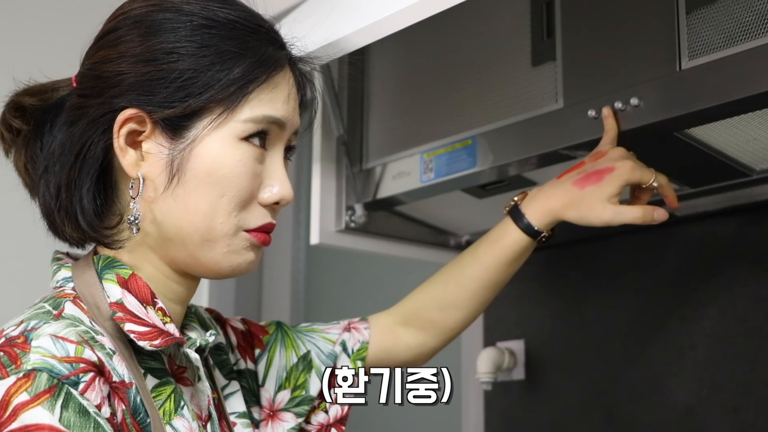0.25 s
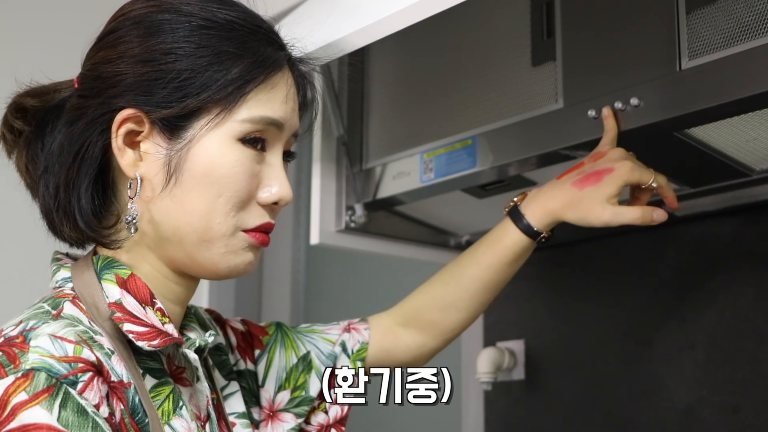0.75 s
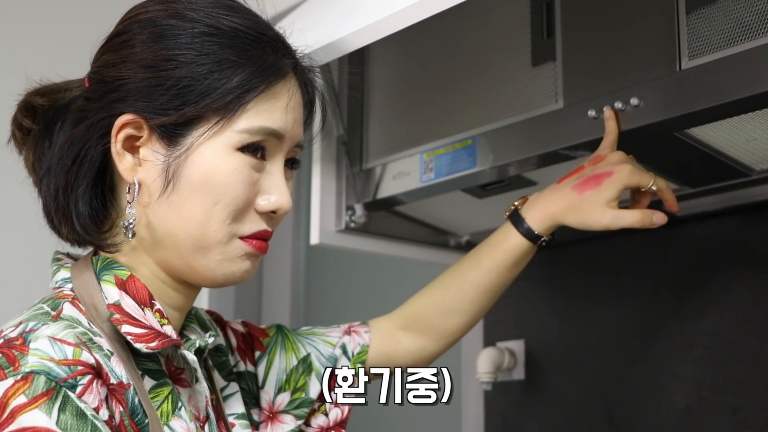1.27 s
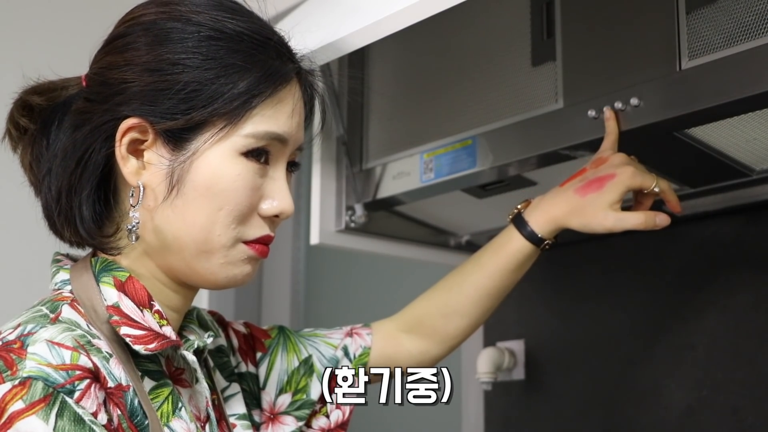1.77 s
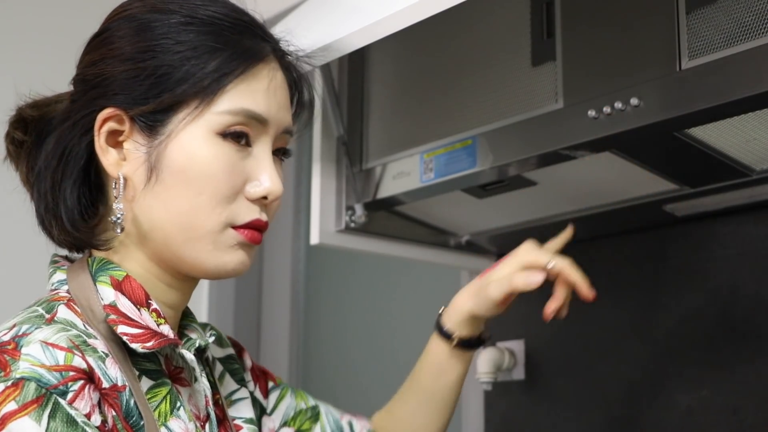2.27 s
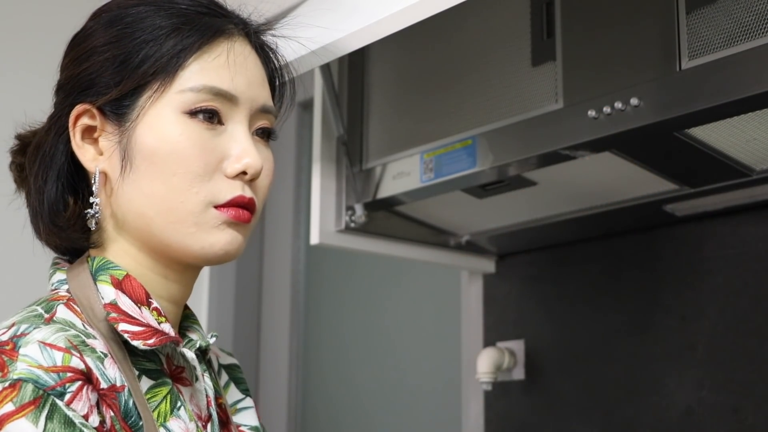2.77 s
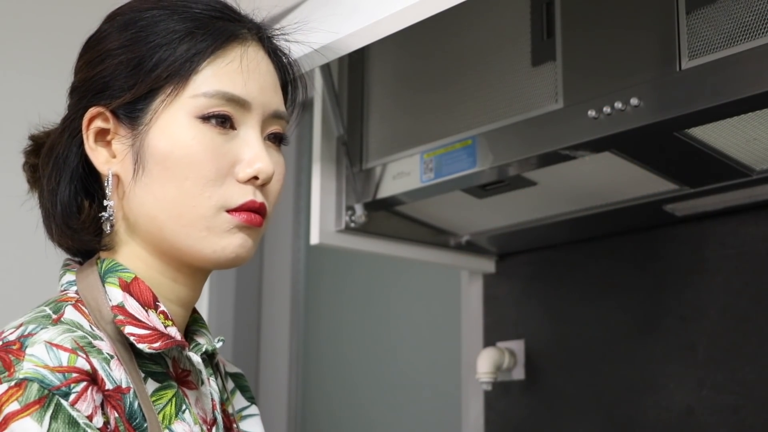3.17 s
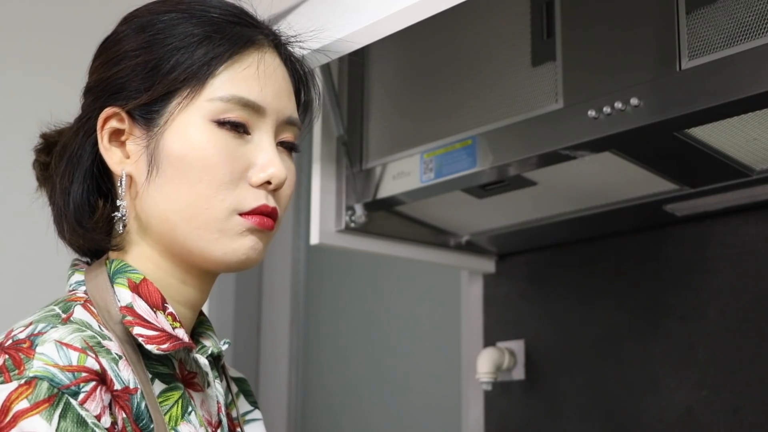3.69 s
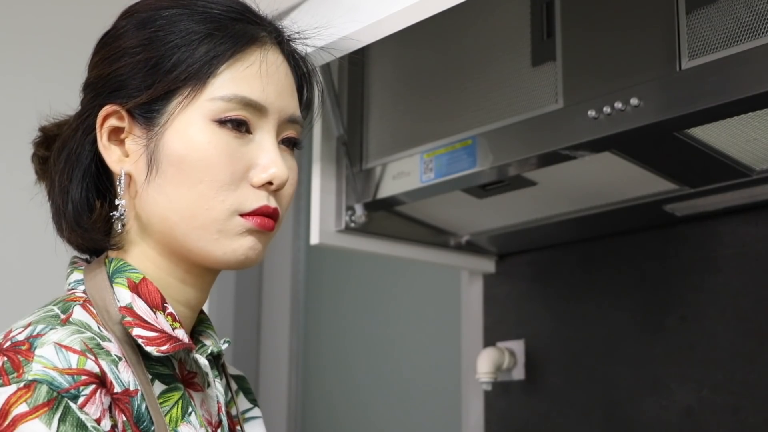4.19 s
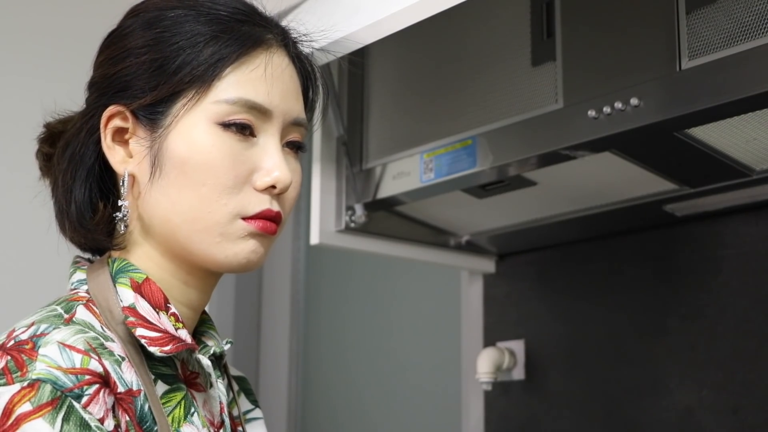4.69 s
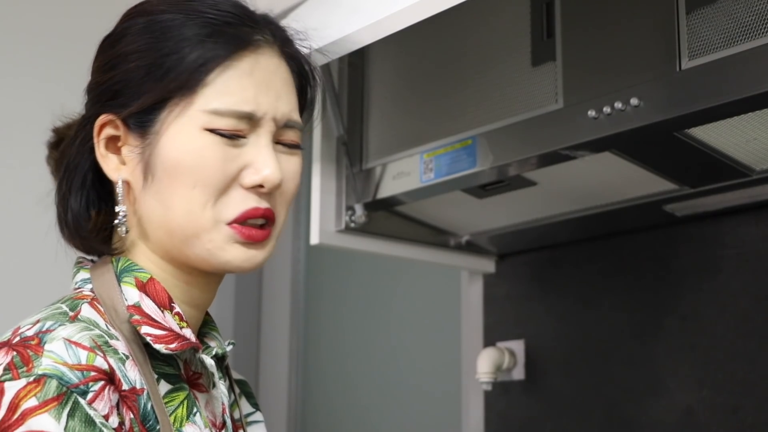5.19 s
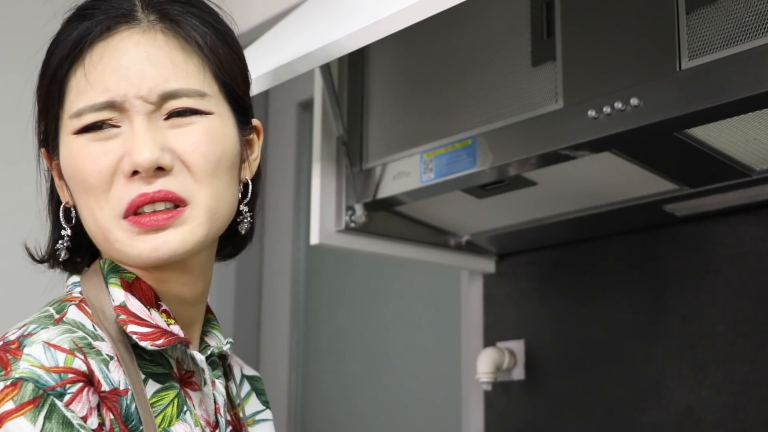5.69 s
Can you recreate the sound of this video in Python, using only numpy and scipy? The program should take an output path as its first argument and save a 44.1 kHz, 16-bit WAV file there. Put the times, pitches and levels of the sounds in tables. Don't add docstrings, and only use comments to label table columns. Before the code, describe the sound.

For about six seconds a kitchen range hood draws air at constant speed, already running at the start and still running at the end. Most of the sound is a deep, boxy rumble, strongest at low and low-mid pitch, coloured by the small room and the metal hood, with a steady low motor hum inside. It wavers in quick irregular throbs, swelling around 1.3, 3.5 and 4.6 s and dipping briefly near 0.8 and 5.6 s. Above it, much quieter, air rushes through the grease mesh with a faintly metallic tint and a thin hiss, both leaning right. A soft puff comes at 0.1 s, very faint ones at 1.65 and 4.6 s, and the sharpest double gust at about 5.6 s. Tiny dry flicks of loose mesh are scattered throughout, including a cluster near 1 s. Stereo camera microphone, indoors, no speech or handling sounds.

```python
import sys
import numpy as np
from scipy import signal
from scipy.fft import rfft, irfft, next_fast_len
from scipy.io import wavfile
from scipy.ndimage import uniform_filter1d, map_coordinates

SR = 44100
rng = np.random.default_rng(int(sys.argv[2]) if len(sys.argv) > 2 else 0)


def wav_out(sig):
    wavfile.write(sys.argv[1], SR, np.round(np.clip(np.atleast_2d(sig).T, -1, 1) * 32767).astype(np.int16))


def natural_amplitude(level_db):
    exponent = np.asarray(level_db, float) / 20
    return 10 ** exponent


N = 262174

# [f/Hz, width/Hz, level/dB
# per Hz]
WAVES_ALIKE = [(62, 33, -71), (81, 11, -68), (113, 12, -59), (128, 15, -56), (150, 12, -55), (175, 17, -51),
               (189, 9, -54), (211, 8, -55), (226, 13, -49), (262, 9, -53), (275, 14, -51), (303, 7, -56),
               (314, 14, -51), (335, 13, -51), (357, 18, -63), (374, 8, -69), (384, 15, -63), (400, 11, -59),
               (418, 14, -65), (442, 15, -63), (454, 10, -65), (474, 12, -66), (482, 10, -70),
               (511, 12, -63), (532, 16, -62), (565, 30, -69), (595, 22, -72), (618, 20, -71),
               (660, 26, -71), (689, 16, -69), (703, 18, -66), (753, 24, -77), (786, 37, -71),
              (820, 14, -78), (845, 20, -71), (874, 26, -71), (903, 21, -74), (917, 31, -77),
              (955, 35, -73), (986, 22, -74), (1007, 31, -76), (1045, 25, -71), (1084, 20, -77),
              (1121, 36, -74), (1164, 27, -72), (1199, 36, -74), (1238, 37, -74), (1290, 42, -75),
              (1325, 24, -81), (1359, 67, -79), (1412, 37, -82), (1450, 27, -72), (1500, 35, -77),
              (1537, 19, -82), (1562, 27, -79), (1594, 35, -80), (1646, 43, -77), (1696, 19, -85),
              (1730, 40, -83)]
# [f/Hz, width/Hz, level/dB per Hz]
WAVES_OPPOSED = [(87, 52, -86), (121, 15, -77), (144, 57, -83), (191, 15, -83), (222, 8, -74),
                 (239, 20, -66), (263, 8, -80), (275, 19, -72), (290, 14, -76), (312, 14, -74),
                 (337, 16, -73), (358, 15, -66), (385, 12, -73), (396, 19, -73), (413, 23, -75),
                 (431, 14, -78), (456, 13, -76), (466, 16, -75), (494, 18, -75), (530, 28, -74),
                 (553, 16, -73), (584, 14, -78), (599, 18, -76), (636, 14, -84), (654, 13, -77),
                 (685, 40, -76),
                 (765, 36, -77), (798, 24, -83), (863, 52, -74), (929, 23, -84), (979, 50, -74),
                (1012, 19, -83), (1042, 53, -80), (1130, 69, -76), (1173, 30, -81), (1233, 41, -79),
                (1287, 61, -80), (1352, 54, -81), (1417, 29, -86), (1458, 47, -77), (1501, 70, -79),
                (1529, 15, -89), (1569, 35, -85), (1626, 70, -82), (1695, 70, -85), (1752, 43, -84)]
# [f/Hz, share/0-1]
NEARER = [(40, .6), (150, 0.1), (300, 0.93), (700, 0.12), (1700, 0.57)]
# [t/s, level/dB]
THROBS = [(.065, 2.5), (.35, -4), (.46, -2.5), (.648, 2), (.71, 1.5), (.84, -5.5), (.938, 3), (1.27, 4),
          (1.53, 0), (2.67, -2), (3.36, -1.5), (3.515, 3), (3.59, 2), (3.84, -4), (4.594, 4.5), (4.75, 2),
          (5.04, -2), (5.19, 2.5), (5.27, -3), (5.42, 2), (5.47, 1), (5.56, -4), (5.605, 2.5)]
DEEP_EDGES_HZ = [140, 198, 247, 292, 365]
# [f/Hz, width/Hz, depth/dB]
NULLS = [(198, 6.6, 3), (246, 11.7, 6.5), (288, 8, 1.5), (467, 8.3, 0), (161, 5.6, 4), (138, 7.7, 1)]


def rumble():
    common, apart = rng.standard_normal((2, N))
    mid = filtered(common, lambda f: resonant(WAVES_ALIKE, f))

    def opposed(f):
        share = np.clip(along(NEARER, f), 0, 1)
        mix = [share * np.exp(-1j * 2.07), np.sqrt(1 - share ** 2)]
        return resonant(WAVES_OPPOSED, f) * mix

    side = filtered(np.array([common, apart]), opposed).sum(axis=0)
    pair = np.array([mid + side, mid - side])

    edges = np.array(DEEP_EDGES_HZ)[:, None, None]
    waves = filtered(pair, lambda f: np.diff(np.tanh((edges - f) / 4) / 2, axis=0))
    deep = sum(surging(wave, *DEEP_EDGES_HZ[k:k + 2]) for k, wave in enumerate(waves))
    rest = pair - waves.sum(axis=0)

    throb_half_s = 0.011
    throb_db = sum(db * bump(s, throb_half_s, throb_half_s) for s, db in THROBS)
    roar = natural_amplitude(0.31 + throb_db) * deep + natural_amplitude(0.41 * wobble(4.15)) * rest
    null_db = lambda f: sum(db * np.exp(-2 * ((f - c) / w) ** 2) for c, w, db in NULLS)
    return filtered(roar, lambda f: natural_amplitude(-null_db(f)))


# [f/Hz, level/dB]
TRIM = [(20, 0), (45, 0.5), (300, 0), (450, 0), (600, 1), (700, 1), (800, 0), (1000, 0.5), (1750, 0.5)]


def resonant(modes, f):
    power = sum(natural_amplitude(2 * db) / (1 + ((f - c) / (.7 * w)) ** 2) ** 2 for c, w, db in modes)
    return np.sqrt(1.1 * power * SR / 2) * natural_amplitude(along(TRIM, f))


# [t/s, level/dB, f/Hz]
SURGES = [(0.086, -8, 225), (0.095, 6.5, 270), (0.109, 3.5, 325), (0.116, 4, 175), (0.297, 4.5, 325),
          (0.444, -6, 225), (0.562, 4, 175), (0.59, -7, 225), (0.628, -1, 225), (0.651, 2.5, 325),
          (0.76, 5, 225), (0.952, 6.5, 225), (1.061, -6, 225), (1.163, -8, 325), (1.347, 3, 225),
          (1.542, 7, 270), (1.68, 6.5, 270), (1.698, 1, 225), (1.966, -6, 225), (2.24, 4, 225),
          (2.293, 3.5, 325), (2.463, 7, 270), (2.596, 3.5, 270), (2.624, 5, 175), (2.646, -7, 325),
          (2.707, 2, 225), (2.785, -5, 225), (2.927, -5, 325), (2.975, 5.5, 225), (3.082, -5, 225),
          (3.104, 4, 325), (3.293, 5, 175), (3.304, 5.5, 270), (3.336, -9, 225), (3.336, -4.5, 325),
          (3.517, 7, 225), (3.528, -5, 325), (3.864, -2.5, 325), (4.057, -9, 270), (4.084, 3.5, 325),
          (4.122, 5.5, 225), (4.24, -4, 325), (4.259, 3, 270), (4.39, 4, 325), (4.472, 4, 270),
          (4.474, -3, 225), (4.601, 5, 270), (4.61, 1, 325), (4.689, -4, 175), (4.726, 3.5, 325),
          (4.76, 4, 225), (4.93, 2.5, 325), (4.973, 5, 225), (5.193, 4, 175), (5.435, 5, 270),
          (5.442, 1, 225), (5.46, 4, 325), (5.61, 4.5, 175), (5.769, 4, 175), (5.83, 4, 225)]


def surging(wave, low_hz, high_hz):
    half_s, reach, evened = 0.029, 1.3, 0.34
    t = np.arange(0, N, 64) / SR
    mine = [(s, db) for s, db, hz in SURGES if low_hz < hz < high_hz]
    surge_db = sum(db * np.exp(-.5 * ((t - s) / half_s) ** 2) for s, db in mine)
    surge_db = np.interp(np.arange(N) / SR, t, surge_db)
    power = np.mean(wave ** 2)
    swell = np.abs(uniform_filter1d(wave.mean(axis=0) ** 2, size=3600)) / power
    return np.sqrt(power) * unit(natural_amplitude(reach * surge_db) * wave / (swell + .05) ** evened)


# [f/Hz, level/dB, left-right level/dB]
HUM = [
    (119.7, -42, 0),
    (251, -93, 0),
    (371, -72, 2),
]


def hum():
    t = np.arange(N) / SR
    out = np.zeros((2, N))
    for hz, db, pan_db in HUM:
        pan = np.array([[pan_db / 2], [-pan_db / 2]])
        level_db = db + 4 + 1.8 * wobble(3.49) + pan
        phase = np.pi + rng.uniform(0, 6.44)
        out += natural_amplitude(level_db) * np.sin(2 * np.pi * hz * t + phase)
    return out


# [f/Hz, level/dB per Hz]
RUSH = [(1500, -40), (1720, 0.5), (1850, 3), (2000, 2.5), (2150, 1), (2500, 1.5), (3200, -1), (3700, -3),
        (4200, -6.5), (4800, -12.5), (6000, -12.5), (8000, -30)]
# [f/Hz, width/Hz, level/dB against the rush]
MESH = [(2016, 51, 1), (2430, 66, -7), (3250, 62, -1), (3740, 45, -1), (4400, 80, -12)]


def rush():
    ring = lambda f: sum(natural_amplitude(2 * db) / (1 + (2 * (f - c) / w) ** 2) for c, w, db in MESH)
    air = at_ports(lambda f: natural_amplitude(along(RUSH, f)) * np.sqrt(1 + ring(f)))
    air = unit(signal.fftconvolve(air, reflections(t60=0.44, db=-12.0), axes=1)[:, :N])
    edge_db = edge_swell_db()
    return natural_amplitude(-49 + 0.39 * (edge_db - edge_db.mean()) + 0.36 * wobble(8)) * air


def reflections(t60, db):
    t = np.arange(SR // 3) / SR
    tail = rng.standard_normal((2, len(t))) * natural_amplitude(-60 * t / t60)
    tail = natural_amplitude(db) * tail / np.linalg.norm(tail[0])
    return np.concatenate([np.ones((2, 1)), tail], axis=1)


# [f/Hz, level/dB per Hz]
HISS = [(2500, -16), (4500, -3), (5200, -5), (6500, 1), (8000, 0), (9500, -3), (11500, -7), (13000, -13.5),
        (15000, -18), (16000, -23)]
# [f/Hz, level/dB per Hz]
PUFF = [(900, -12), (1700, 4), (2500, 4), (3300, 4), (3900, 6), (5000, -20), (6500, -10), (8000, -1),
        (11000, -16), (15500, -30)]
# [t/s, level/dB, half length/s]
GUSTS = [
    (.105, -55, .02),
    (1.65, -66, .012),
    (4.58, -58, .012),
    (5.62, -47, 0.008),
    (5.642, -49, .01),
]


def hiss():
    t = np.arange(N) / SR
    level_db = -61 + edge_swell_db() + 3.5 + 0.41 * wobble(14) + 1.0 * wobble(40)
    steady = natural_amplitude(level_db) * at_ports(lambda f: natural_amplitude(along(HISS, f)))
    gust = sum(natural_amplitude(db) * np.exp(-.5 * ((t - s) / half) ** 2) for s, db, half in GUSTS)
    return steady + gust * at_ports(lambda f: natural_amplitude(along(PUFF, f)))


# [t/s, level/dB over calm, half length/s]
SWELLS = [(.0, 2, .04), (0.107, 6.5, 0.04), (.21, 1.5, .04), (.68, 2, 0.068), (1.12, 0.5, .12),
          (1.48, 3, 0.022), (1.65, 3.5, .02), (2.294, 1.5, .04), (3.02, 3.5, .025), (3.265, 2, .035),
          (3.6, 1.5, 0.066), (4.577, 4.5, .02), (4.66, 1.5, 0.062), (5.182, 1, 0.064), (5.623, 8, 0.04),
          (5.57, 3.5, .03), (5.7, 2, .025)]


def edge_swell_db():
    return sum(db * bump(s, 0.46 * half, 0.75 * half) for s, db, half in SWELLS)


# [t/s, level/dB, centre f/Hz, width/Hz, half length/s]
FLUTTERS = [(.209, -77, 8000, 5000, .003), (.552, -60, 9000, 6000, .003), (0.955, -56, 7200, 2000, .0015),
            (1.008, -54, 8500, 6000, .0025), (1.017, -60, 11000, 5000, .004), (.07, -58, 7500, 4000, .003),
            (2.416, -60, 7000, 4000, .002), (4.557, -59, 7500, 4000, .003), (1.649, -62, 9500, 8000, .006),
            (3.006, -59, 9000, 6000, .003), (3.226, -62, 8000, 4000, .003), (3.275, -59, 7600, 450, .008),
            (3.627, -64, 7500, 3000, .003), (3.885, -60, 10500, 5000, .004),
            (4.242, -59, 11000, 5000, .003), (4.648, -62, 9000, 6000, .003),
            (4.742, -59, 11000, 5000, .003), (5.148, -56, 9500, 7000, .004), (5.555, -59, 9000, 7000, .003)]


def flutter():
    t = np.arange(-1500, 1500) / SR
    out = np.zeros((2, N))
    hz = np.fft.rfftfreq(len(t), 1 / SR)
    for s, db, centre_hz, width_hz, half in FLUTTERS:
        colour = np.exp(-2 * ((hz - centre_hz) / width_hz) ** 2)
        burst = unit(irfft(rfft(rng.standard_normal((2, len(t)))) * colour))
        start = round(s * SR) - len(t) // 2
        out[:, start:][:, :len(t)] += natural_amplitude(db) * np.exp(-.5 * (t / half) ** 2) * burst
    return natural_amplitude([[-2.5], [2.5]]) * out


# [f/Hz, likeness/0-1]
ALIKE = [(400, 0.33), (700, 0.91), (1400, 0.38), (3000, 0.28), (6000, 0.37), (9000, 0.16), (15000, .1)]
# [f/Hz, level/dB]
LEAN = [(400, 1), (1300, -3.5), (2400, -4.5), (4400, -3.5), (8000, -6.5), (15000, -3.5)]


def at_ports(response):
    lag_s = 3 / 44100
    half = np.array([[.5], [-.5]])

    def mid_side(hz):
        turn = np.arccos(np.clip(along(ALIKE, hz), -1, 1)) / 2
        return response(hz) * [np.cos(turn), np.sin(turn)]

    def place(hz):
        return natural_amplitude(half * along(LEAN, hz)) * np.exp(-2j * np.pi * hz * lag_s * half)

    mid, side = filtered(rng.standard_normal((2, N)), mid_side)
    return unit(filtered(np.array([mid + side, mid - side]), place))


def along(points, hz):
    f, v = np.transpose(points)
    return np.interp(np.log(hz + 1), np.log(f + 1), v)


def unit(x):
    return x / np.sqrt(np.mean(x ** 2) + 1e-20)


def wobble(rate):
    knots = rng.standard_normal(int(N * rate / SR) + 4)
    return map_coordinates(knots, [np.arange(N) * rate / SR])


def bump(s, rise, fall):
    t = np.arange(N) / SR - s
    return np.exp(-.5 * (t / np.where(t < 0, rise, fall)) ** 2)


def filtered(x, response):
    m = next_fast_len(N + SR // 2)
    return irfft(rfft(x, m) * response(np.fft.rfftfreq(m, 1 / SR)), m)[..., :N]


def scene():
    return rumble() + hum() + rush() + hiss() + flutter()


def top_cut(x):
    return signal.sosfilt(signal.butter(12, 15760, fs=SR, output="sos"), x)


def record(dry):
    return top_cut(dry)


dry = scene()
out = record(dry)
wav_out(out)
```